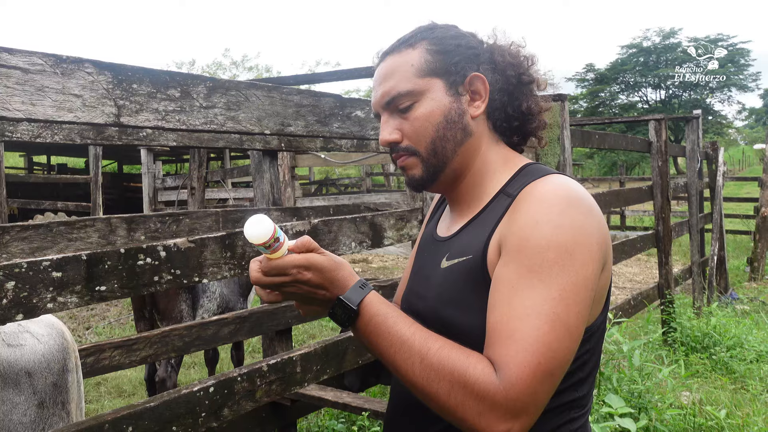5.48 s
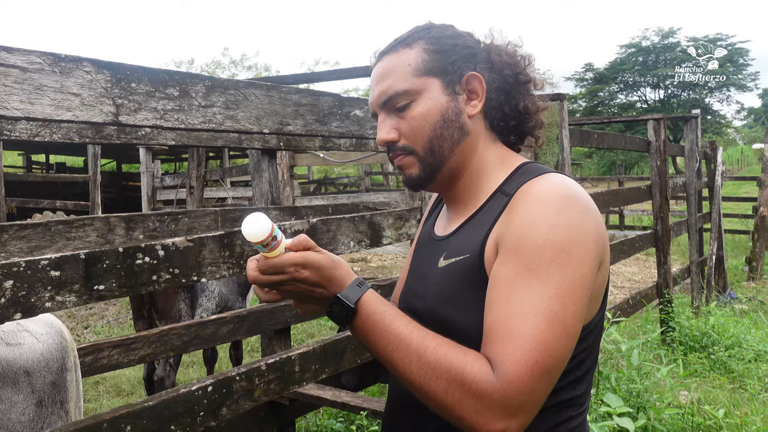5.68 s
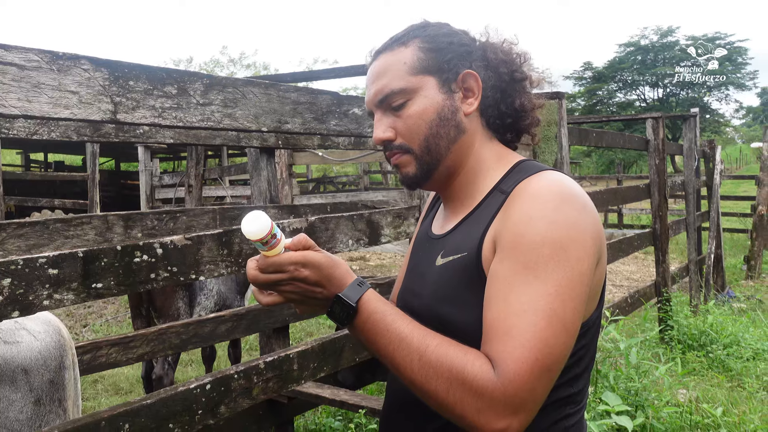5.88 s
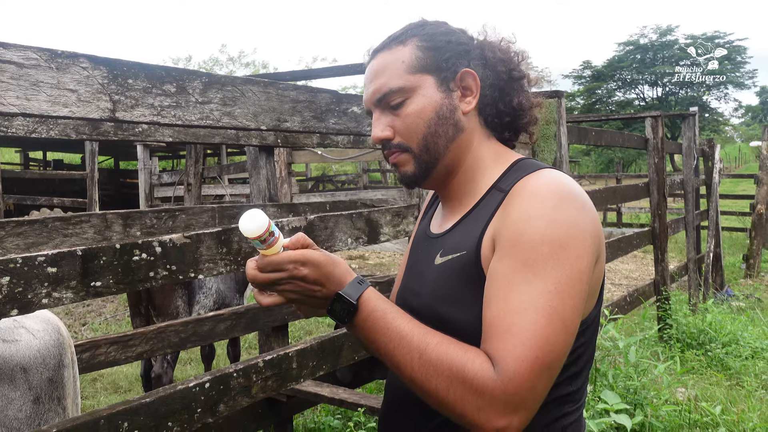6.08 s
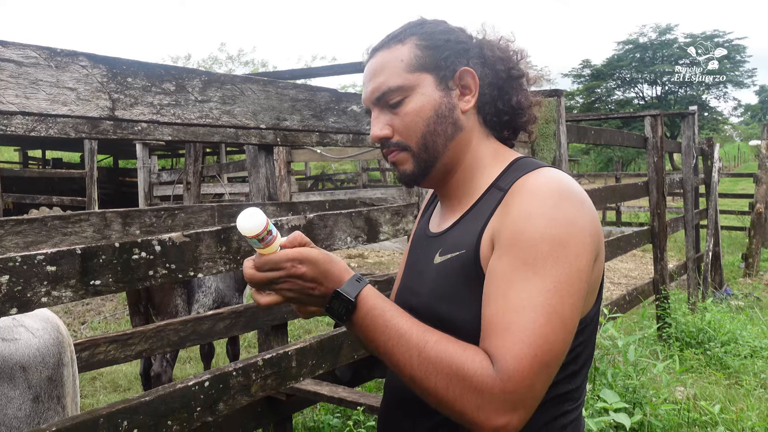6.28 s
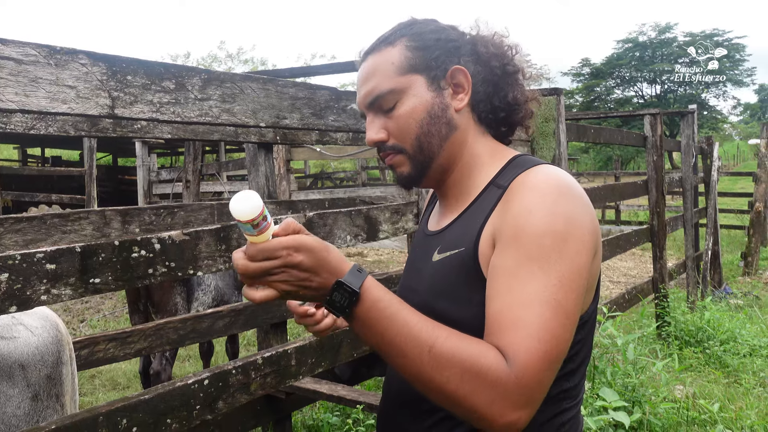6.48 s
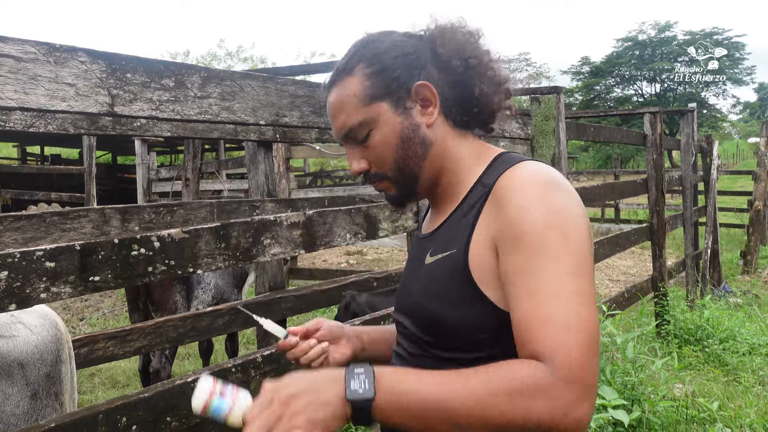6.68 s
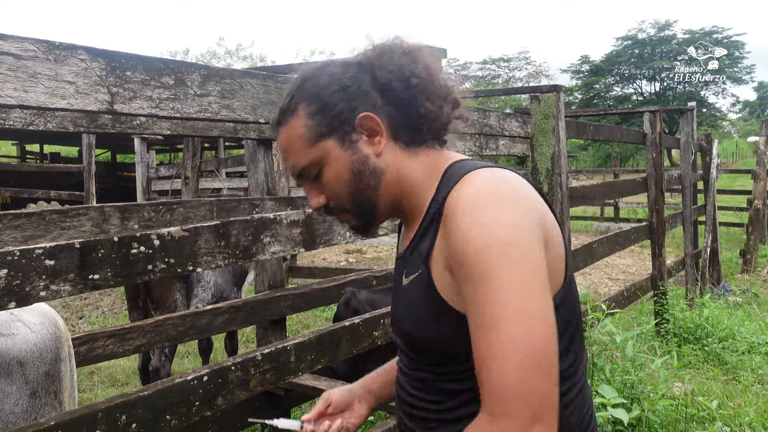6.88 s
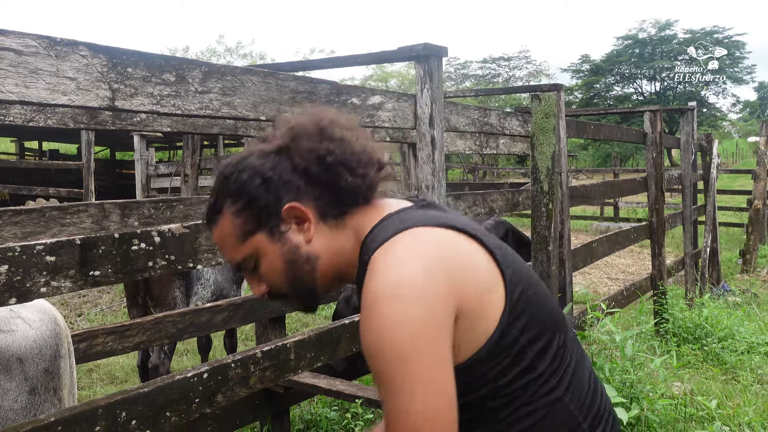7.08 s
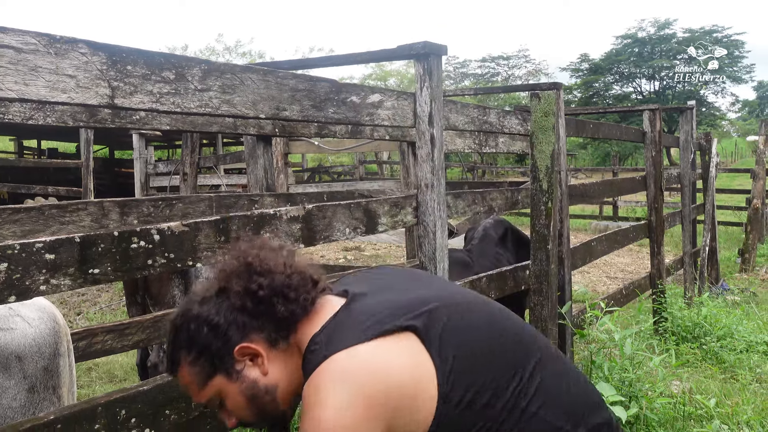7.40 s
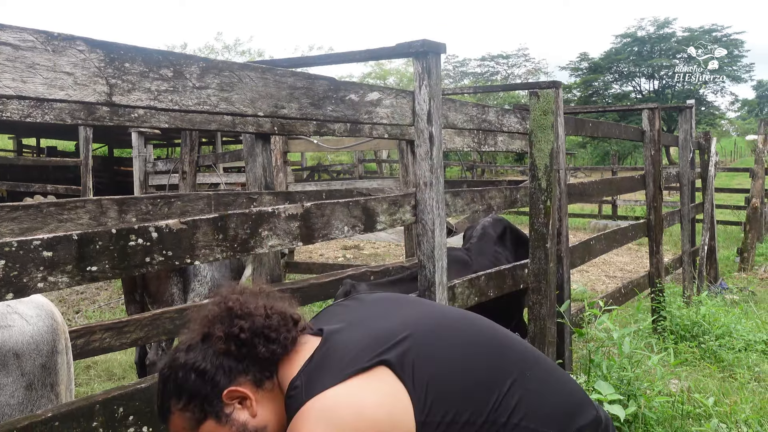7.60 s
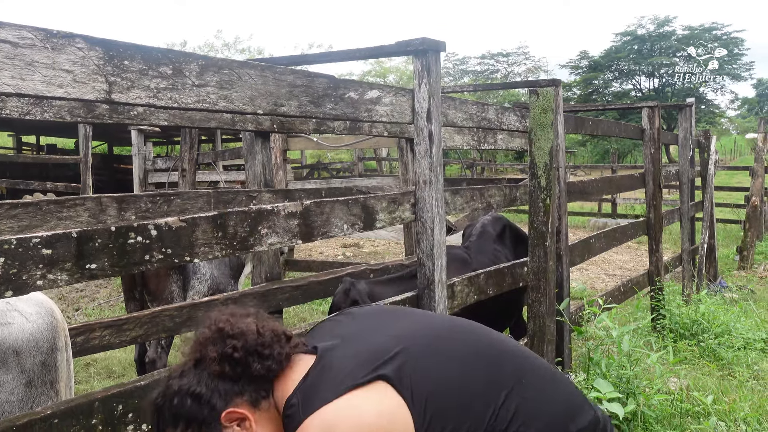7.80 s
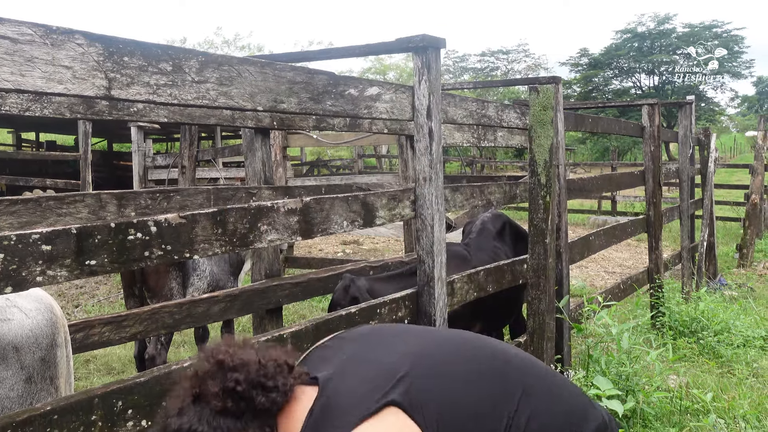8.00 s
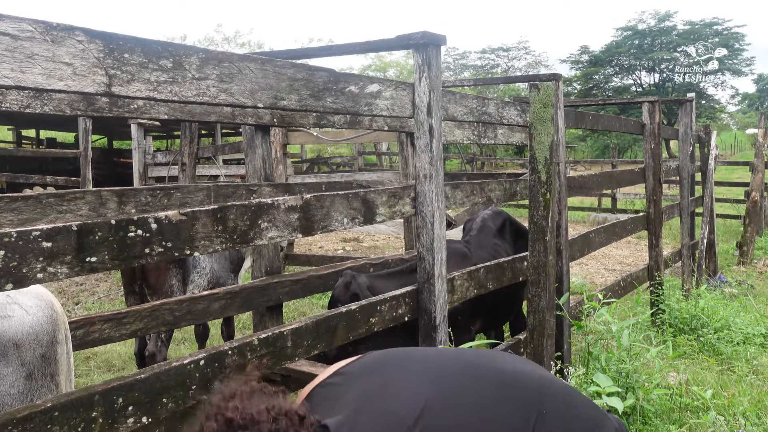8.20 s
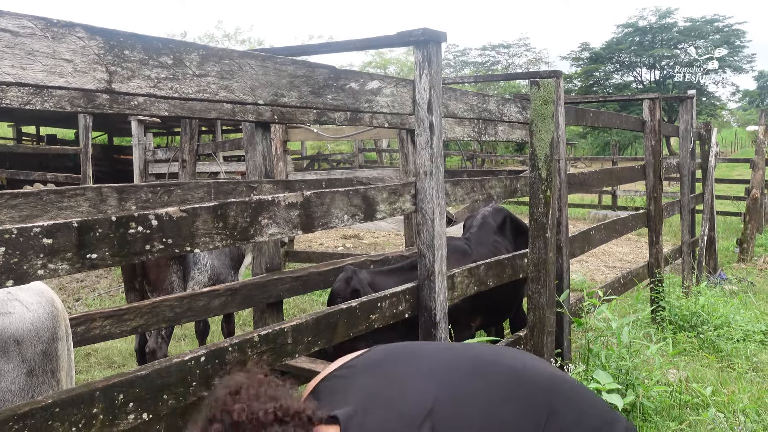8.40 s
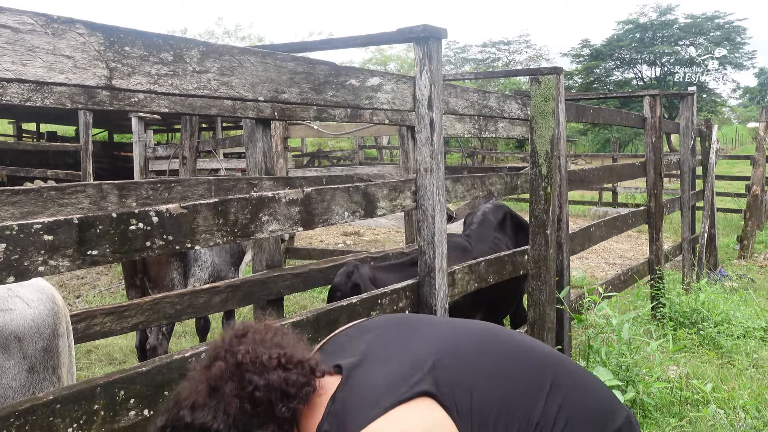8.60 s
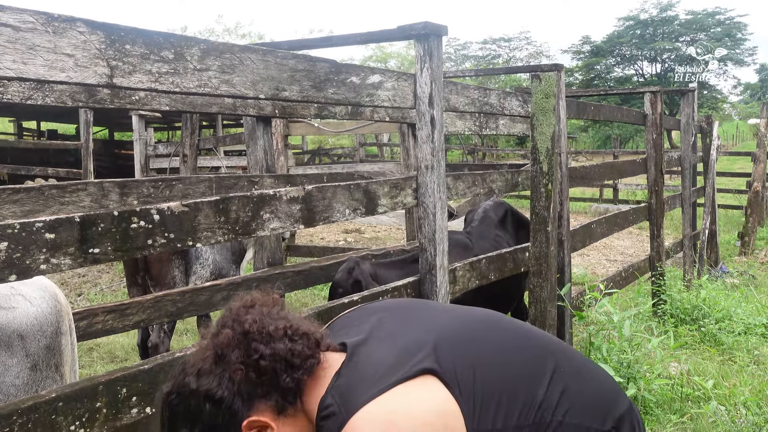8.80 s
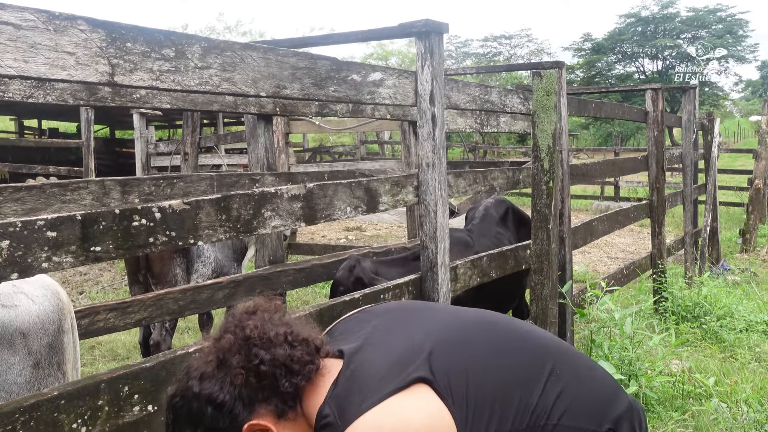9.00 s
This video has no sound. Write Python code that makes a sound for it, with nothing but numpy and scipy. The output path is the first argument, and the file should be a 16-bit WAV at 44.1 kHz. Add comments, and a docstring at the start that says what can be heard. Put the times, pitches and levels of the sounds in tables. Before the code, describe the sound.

An open pasture beside a wooden corral, heard in stereo with faint soft air and hiss. A high pulsed katydid trill runs throughout over a shimmering insect chorus, growing somewhat stronger after 3 s. Small birds give quick falling chips and buzzy chirps all along; clear sinking whistles come at 3.0 and 5.8 s. Far parakeets chatter raspily around 0.4-1 s, 4.6 s and repeatedly from 7.2 to 8.8 s. Dull wooden bumps sound at 0.6, 1.1 and 1.3 s, with a faint one at 2.1 s and tiny clicks at 2.6 s. From 5.3 to 6.0 s a cow gives one short, low, rough nasal moo, opening and then sagging in pitch. Small hard objects click close by at 6.4 s, then clatter sharply on a plank at 7.8-7.9 s, by far the loudest event, with slight outdoor echo. Duller knocks follow at 8.5 and 9.0-9.1 s.

```python
"""A wooden corral in damp pasture: a cow moos once, with a few dull bumps from the pen.
Air is shaped noise; katydids are pulsed falling tones over a noise chorus. Small birds chip and whistle on gliding
tones, and far parakeets chatter in raspy harmonics. Close by, small things are handled and set down on a plank with
a sharp clatter: noise snaps and decaying modes. The moo is a harmonic series weighted by chest, mouth and nose."""
import sys
import numpy as np
from scipy import signal
from scipy.fft import rfft, irfft
from scipy.io import wavfile
from scipy.ndimage import uniform_filter1d

SR = 44100
rng = np.random.default_rng(int(sys.argv[2]) if len(sys.argv) > 2 else 0)


def wav_out(sig):
    """Save sig, one row per channel (or a flat mono array), as 16-bit PCM at SR to the path in sys.argv[1]."""
    wavfile.write(sys.argv[1], SR, np.round(np.clip(np.atleast_2d(sig).T, -1, 1) * 32767).astype(np.int16))


N = 403375
TIME = np.arange(N) / SR
BINS_HZ = np.maximum(np.arange(N // 2 + 1) * SR / N, 1)

# Push of the cow's breath. Each row: time in seconds, chest tone level in dB.
EFFORT = [(5.0, -64.5), (5.3, -60), (5.335, -46.5), (5.37, -42), (5.536, -34), (5.734, -35.5), (5.85, -38),
          (5.907, -36.5), (5.95, -41), (5.98, -45), (6.02, -58)]


def from_db(db):
    """Decibels to amplitude gain."""
    return 10 ** (np.asarray(db) / 20)


def rms_one(x):
    """Scale to unit power."""
    return x / np.sqrt(np.mean(x ** 2) + 1e-20)


def at_hz(points, hz):
    """Read a spectrum on a log-frequency axis."""
    points = np.array(points)
    return np.interp(np.log(hz), np.log(points[:, 0]), points[:, 1])


def follow(rows, t):
    """Read every column of a curve at times t."""
    s, *columns = np.transpose(rows)
    return [np.interp(t, s, c) for c in columns]


def span(start, end):
    """Sample times between two moments in seconds."""
    return start + np.arange(max(int((end - start) * SR), 2)) / SR


def drift(rate_hz, size):
    """Gaussian values drawn rate_hz times a second, joined by straight lines."""
    steps = np.arange(size) * rate_hz / SR
    count = int(steps[-1]) + 2
    return np.interp(steps, np.arange(count), rng.standard_normal(count))


def phase_of(hz):
    """Running phase in radians of a moving pitch."""
    return 2 * np.pi * np.cumsum(hz) / SR


def fade(t, edge_s):
    """Linear ramps at start and end."""
    return np.clip(np.minimum(t - t[0], t[-1] - t) / edge_s, 0, 1)


def panned(x, pan_db):
    """Split to stereo, left minus right = pan_db."""
    return x * from_db(np.array([[.5], [-.5]]) * pan_db)


def add(out, start_s, x):
    """Mix x in at a moment."""
    i = max(round(start_s * SR), 0)
    out[..., i:i + x.shape[-1]] += x[..., :N - i]


def resonances(modes, hz):
    """Summed gain of resonances (Hz, width Hz, dB) at the given frequencies."""
    return sum(from_db(db) / (1 + ((hz - centre) / width * 2) ** 2) for centre, width, db in modes)


def noise(gain):
    """Unit-power stereo noise of a given gain per frequency, ears alike by a share that varies with frequency."""
    # Each row: frequency in Hz, left-right correlation.
    likeness = [(60, 0.64), (110, 0.63), (200, 0.19), (380, 0.58), (700, -0.037), (1290, 0.13),
                (2380, 0.069), (4400, 0.57), (8120, 0.12), (15000, 0.41)]
    # Each row: frequency in Hz, left minus right in dB.
    lean = [(60, -2), (110, 1), (200, 1.5), (380, 3), (700, -8), (1290, 7), (2380, -2.5), (4400, 2.5),
            (8120, -3), (15000, 0)]
    mid, side = rfft(rng.standard_normal((2, N)))
    alike = np.clip(at_hz(likeness, BINS_HZ), 0, .98)
    both = np.sqrt(1 + alike) * mid + np.sqrt(1 - alike) * side * [[1], [-1]]
    return rms_one(irfft(panned(both * gain, at_hz(lean, BINS_HZ)), N))


def scatter(x, t60, delay_s):
    """Diffuse unit-energy echo from fences and foliage, different in each ear; delay_s is its build-up time."""
    t = np.arange(SR // 2) / SR
    echo = rng.standard_normal((2, len(t))) * from_db(-60 * t / t60) * np.clip(t / delay_s, 0, 1)
    echo /= np.sqrt(np.sum(echo ** 2, axis=1, keepdims=True))
    return signal.fftconvolve(np.atleast_2d(x), echo, axes=1)[:, :N]


def struck(modes, t, uneven_db=2.5):
    """Decaying sine modes (Hz, dB, t60 s), each with random strength and sign."""
    ring = 0
    for hz, db, t60 in modes:
        gain = from_db(db + rng.normal(0, uneven_db) - 60 * t / t60)
        ring = ring + gain * np.sin(2 * np.pi * hz * t) * rng.choice([-1, 1])
    return ring


def air():
    """Still air over the pasture: noise shaped to a soft murmur under a faint hiss."""
    # Murmur and hiss spectra. Each row: frequency in Hz, relative density in dB.
    murmur_db, hiss_db = [(18, -83), (30, -43.5), (134, -19.5), (174, -15.5), (230, -13), (352, -13.5),
                          (400, -1), (528, -10), (613, -1.5), (684, -7), (737, -13.5), (903, -9.5),
                          (1280, -17.5), (1730, -16.5), (2500, -22), (3250, -78), (5500, -120)], [(1800, -33), (2600, 3), (3800, 4), (5000, 1), (6200, 13),
                                           (8200, 8.5), (10000, 0.5), (10600, 0.5), (13000, 5), (15500, 0),
                                           (17000, -3)]
    low = from_db(-46.5) * noise(from_db(at_hz(murmur_db, BINS_HZ))) * from_db(0.75 * drift(11, N))
    return low + from_db(-49.0) * noise(from_db(at_hz(hiss_db, BINS_HZ)))


def katydid(strokes_hz, carrier_hz, sweep, unsteady_db):
    """Every wing stroke scrapes out a short tone that falls in pitch."""
    stroke = phase_of(strokes_hz * (1 + 0.0056 * drift(5.8, N))) / (2 * np.pi) % 1
    tone = np.sin(phase_of(carrier_hz * (1 - sweep * (stroke - .5) + 0.00975 * drift(700, N))))
    return rms_one(tone * np.sin(np.pi * stroke) ** 4 * from_db(unsteady_db * drift(25, N)))


def insects():
    """A few katydids of pulsed tone stand out from a chorus of flickering band noise."""
    # Nearest katydid. Each row: time in seconds, level in dB.
    nearest = [(0, -60.5), (3.2, -56.5), (3.7, -52), (7.0, -49.5), (9.15, -52)]
    # Steady ones further off. Each row: wing strokes per second, pitch in Hz, level in dB, pan in dB.
    neighbours = [(64.9, 9150, -62, -19), (60.3, 7380, -58.5, -1), (58.3, 9500, -62, -7)]
    # Far chorus bands. Each row: centre in Hz, width in Hz (before squaring), level in dB.
    chorus = [(7300, 1450, -50.5), (9400, 1730, -50)]
    near = katydid(strokes_hz=65.1, carrier_hz=6870, sweep=0.1, unsteady_db=1.5)
    near = panned(near * from_db(follow(nearest, TIME)[0]), -4.0)
    for strokes_hz, pitch_hz, db, pan_db in neighbours:
        near = near + panned(from_db(db) * katydid(strokes_hz, pitch_hz, sweep=0.059, unsteady_db=3.0), pan_db)
    far = 0
    for hz, width_hz, db in chorus:
        band = noise(resonances([(hz, width_hz, 0)], BINS_HZ) ** 2)
        far = far + from_db(db) * band * from_db(1.0 * drift(110, N))
    return near + from_db(-2.5) * scatter(near, t60=0.38, delay_s=0.002) + far


def note(t, hz, db, overtone_db, waver=0.0066):
    """A nearly pure bird note on a gliding pitch, fluttering in level."""
    phase = phase_of(hz * (1 + waver * drift(394.0, len(t))))
    envelope = from_db(db + 1.3 * drift(130, len(t))) * fade(t, .002)
    return envelope * (np.sin(phase) + from_db(overtone_db) * np.sin(2 * phase))


def near_birds():
    """Sinking whistled songs, faint rising slurs and quick falling tsiks: gliding tones, centred but for the echo."""
    # Repeats of one song. Each row: start in seconds, level in dB, pitch factor.
    songs = [(2.959, -32.5, 0.996), (5.81, -31, 1.008)]
    # Grace note, long whistle with two fainter echoes of the grace note above it, closing slur. Each row:
    # seconds after onset, length in seconds, start and end in Hz and extra onset Hz (all before tune and droop),
    # relative level in dB, dying away in dB.
    song_notes = [(0.003, 0.0266, 5100, 4370, 300, -4, 6), (0.023, .235, 3860, 3313, 354, 1.5, 18.5),
                  (0.027, .035, 4600, 4540, 0, -7, 6), (.135, 0.057, 4640, 4580, 0, -16, 4),
                  (0.256, 0.037, 3900, 3370, 1400, -5.5, 6)]
    # Rising slurs. Each row: start in seconds, length in seconds, starting Hz, level in dB.
    slurs = [(1.115, .11, 4330, -52), (1.332, .11, 3700, -55.5)]
    # Each row: start in seconds, level in dB, pitch factor.
    tsiks = [(0.145, -41, 1.04), (0.722, -38, 0.96), (1.26, -42.5, 0.98), (1.936, -47, 1.2),
             (3.034, -38, 1.05), (3.246, -39.5, 0.96), (3.524, -38.5, 1.1), (3.948, -45, 1.17),
             (4.447, -45, 1.2), (5.161, -47, 0.86), (5.562, -40, 0.98), (6.179, -34, 1),
             (6.532, -34.5, 1.09), (7.114, -39.5, 1.02), (7.545, -36, 1.09), (8.279, -42.5, 0.94),
             (8.781, -37.5, 0.94)]
    # One tsik. Each row: seconds after onset, Hz at factor 1, relative level in dB.
    tsik = [(0, 6400, -14), (.004, 5900, 0), (.011, 4900, -1), (.019, 4000, -3), (.027, 3250, -9),
            (.032, 2950, -22)]
    droop = 0.087  # pitch share lost by the end of the long whistle, less in shorter notes
    drop_s, attack_s, slur_rise_hz_per_s = 0.00424, 0.0071, 5200
    out = np.zeros(N)
    for start_s, song_db, tune in songs:
        for after_s, length_s, from_hz, to_hz, drop_hz, db, dying_db in song_notes:
            t = span(0, length_s)
            sag = 1 - droop * (t / song_notes[1][1]) ** 4
            glide_hz = from_hz + (to_hz - from_hz) * t / length_s + drop_hz * np.exp(-t / drop_s)
            level_db = song_db + db - dying_db * (t / length_s) ** 2
            whistle = note(t, tune * sag * glide_hz, level_db, overtone_db=-15.0)
            add(out, start_s + after_s, whistle * fade(t, attack_s))
    for start_s, length_s, from_hz, db in slurs:
        t = span(0, length_s)
        add(out, start_s, note(t, from_hz + slur_rise_hz_per_s * t, db, overtone_db=-19.0))
    t = span(0, tsik[-1][0])
    tsik_hz, tsik_db = follow(tsik, t)
    for start_s, db, tune in tsiks:
        add(out, start_s, note(t, tune * tsik_hz, db + tsik_db, overtone_db=-29, waver=0.0295))
    return out + from_db(-9) * scatter(out, t60=0.97, delay_s=0.016)


def shrill_share(hz):
    """How far a frequency belongs to the shrill top of a call, 0-1."""
    from_hz, full_hz = 3660, 4660
    return np.clip((hz - from_hz) / (full_hz - from_hz), 0, 1)


def squawk(length_s, pitch_hz, arch, shrill_db=0, rasp=0.018, root_db=-4):
    """A raspy parakeet call: six harmonics on an arching, jittered pitch, the lowest changed by root_db."""
    # Call spectrum. Each row: frequency in Hz, relative level in dB.
    screech = [(600, -57), (1100, -0.5), (1550, -5.5), (2050, 1), (3200, -1.5), (4000, 2.5), (4900, -6.5),
               (5600, -7.5), (6800, -24)]
    t = span(0, length_s)
    hz = pitch_hz * (1 - arch * (2 * t / length_s - 1) ** 2 + rasp * drift(900, len(t)))
    k = np.arange(1, 7)[:, None]
    partial_hz = k * pitch_hz
    gains = from_db(at_hz(screech, partial_hz) + shrill_db * shrill_share(partial_hz) + root_db * (k == 1))
    return rms_one(np.sum(gains * np.sin(k * phase_of(hz)), axis=0)) * np.sin(np.pi * t / length_s)


def parakeets(count=700, far_rasp=0.055, blur=0.7, voice_hz=1600, low_voice_hz=1250, voice_spread=0.13):
    """Many overlapping far calls blur into a wash that swells in bouts, some shriller; a few calls stand out."""
    # Each row: peak time in seconds, peak level in dB, swell time in seconds, shrillness in dB.
    bouts = [(.37, -46.5, 0.037, -2.5), (.74, -43, 0.17, 2), (1.0, -43.5, 0.057, 10.5),
             (4.45, -50.5, 0.038, 5.5), (4.62, -47, 0.078, 7.5), (4.74, -41.5, 0.075, 1.5),
             (6.18, -46.5, 0.1, 2), (7.27, -42.5, 0.11, -3), (7.41, -42.5, 0.072, -17),
             (7.67, -41.5, 0.077, -8), (8.0, -47, 0.12, -4), (8.12, -43.5, 0.095, -10),
             (8.45, -38, 0.072, -9), (8.55, -37, 0.025, -5), (8.74, -43, 0.09, 4)]
    # Clearest calls. Each row: start in seconds, length in seconds, pitch in Hz, relative level in dB,
    # shrillness in dB, arch as a share of pitch.
    squawks = [(0.68, 0.049, 1495, -45, 3, 0.035), (0.722, 0.045, 1535, -40.5, -4, 0.075),
               (0.947, 0.046, 1563, -39, -2, 0.05), (0.992, 0.054, 1273, -37, 14, 0.082),
               (4.63, 0.071, 1588, -41, 7, 0.028), (4.681, 0.064, 1596, -41.5, -3, 0.024),
               (4.741, .05, 1330, -41.5, 6, 0.04), (7.232, 0.043, 1573, -44, -8, 0.057),
               (7.306, 0.059, 1660, -45, -8, .05), (7.335, 0.049, 1790, -41, -10, 0.1),
               (7.373, 0.031, 1650, -40, -8, 0.13), (7.427, 0.045, 1630, -41.5, -8, .1),
               (7.587, 0.055, 1876, -49, -8, 0.058), (7.637, 0.046, 1710, -39, -4, 0.089),
               (7.74, 0.038, 1530, -42.5, -7, .05), (7.981, 0.049, 1870, -37, 2, 0.046),
               (8.058, 0.052, 1790, -36.5, -10, 0.053), (8.104, 0.034, 1697, -38.5, -10, 0.068),
               (8.162, 0.029, 1970, -43, -4, 0.054), (8.313, 0.068, 1640, -41.5, -3, 0.063),
               (8.652, 0.078, 2020, -41.5, -2, 0.046), (8.713, .05, 1650, -44, -10, 0.058)]
    fall, roundness = 2.02, 1.18  # fall in swell times; roundness 1 = pointed peak, 2 = bell
    crowd, clear = np.zeros(N), np.zeros(N)
    # two calls in three, on average, are pitched high
    pitches = rng.choice([voice_hz, voice_hz, low_voice_hz], count)
    pitches = pitches * np.exp(voice_spread * rng.standard_normal(count))
    for (when, length, arch), pitch_hz in zip(rng.random((count, 3)), pitches):
        call = squawk(.03 + 0.04915 * length, pitch_hz, arch=0.1014 * arch, rasp=far_rasp, root_db=-2)
        add(crowd, when * N / SR, call)
    crowd = crowd + blur * scatter(crowd, t60=0.49, delay_s=0.0048)
    # level the wash so that the bouts alone set its swell
    crowd /= np.sqrt(uniform_filter1d(np.mean(crowd ** 2, axis=0), SR // 12) + 1e-6)
    top = irfft(rfft(crowd) * shrill_share(BINS_HZ), N)
    # overlapping bouts add in power
    power, top_power = 0, 0
    for peak_s, db, swell_s, shrill_db in bouts:
        away = np.maximum(peak_s - TIME, (TIME - peak_s) / fall) / swell_s
        bout = (from_db(db) * np.exp(-away ** roundness)) ** 2
        power = power + bout
        top_power = top_power + bout * from_db(shrill_db) ** 2
    for start_s, length_s, pitch_hz, db, shrill_db, arch in squawks:
        add(clear, start_s, from_db(db) * squawk(length_s, pitch_hz, arch, shrill_db))
    wash = np.sqrt(power) * (crowd - top) + np.sqrt(top_power) * top
    echo = scatter(clear, t60=0.95, delay_s=0.0041)
    return panned(wash + from_db(-1.0) * clear + from_db(-3.5) * echo, -4.0)


def bumps(contact_s=0.0041, reach=0.94):
    """Dull blows on wood: soft contact wakes mainly the rail modes near each blow's own pitch."""
    # Each row: start in seconds, peak level in dB (before echo), centre in Hz.
    blows = [(.557, -29, 434), (0.642, -33.5, 423), (0.674, -26, 440), (1.074, -35, 397), (1.283, -31, 547),
             (2.106, -38, 191), (8.538, -30, 1320), (9.01, -24, 980), (9.039, -37, 810), (9.05, -39, 474),
             (9.088, -29.5, 1350), (9.116, -25, 940), (9.137, -28, 1310)]
    # Modes of the rail. Each row: frequency in Hz, relative level in dB, t60 in seconds.
    rail = [(161, -17, 0.079), (238, -11.5, 0.091), (419.7, 3.5, 0.1), (485, 12, 0.038), (570, -10, 0.02),
            (856, 10.5, 0.026), (1110, 4, 0.034), (1227, 8, 0.027), (1377, 12, 0.036)]
    out, t = np.zeros(N), span(0, .2)
    for start_s, db, centre_hz in blows:
        modes = [(hz, level_db - 10 * reach * np.log2(hz / centre_hz) ** 2, t60) for hz, level_db, t60 in rail]
        blow = struck(modes, t) * fade(t, contact_s)
        add(out, start_s, from_db(db) * blow / np.abs(blow).max())
    return out + from_db(-0.5) * scatter(out, t60=0.35, delay_s=0.0061)


def tree_birds(length_s=0.044, buzz_hz=170, leaves_t60=0.65):
    """Buzzy chips, short tones warbled in pitch, reach the ears mostly by way of the leaves."""
    # Each row: start in seconds, relative level in dB, pitch in Hz, warble depth as a share of pitch, pan in dB.
    chips = [(0.565, -32.5, 5300, 0.061, -5), (1.232, -31, 5230, 0.037, -3), (1.494, -34.5, 5040, 0.11, -3),
             (2.299, -33, 5400, 0.047, -6), (2.412, -33, 4860, 0.062, -2), (3.204, -31, 5300, 0.054, -6),
             (3.244, -36, 5090, 0.073, 1), (4.061, -35.5, 5380, 0.059, -10), (4.109, -35.5, 4990, 0.099, 0),
             (5.16, -35, 5080, 0.087, -4), (5.204, -31, 5300, 0.03, -1), (5.911, -32.5, 5140, 0.056, -6),
             (6.004, -31, 5155, 0.107, 0), (6.675, -32, 5160, 0.092, -5), (6.73, -38.5, 5200, 0.033, -2),
             (7.48, -33, 5270, 0.04, -3), (7.992, -36.5, 4900, 0.069, -3), (8.404, -31, 5320, 0.049, -3),
             (8.755, -35.5, 4990, 0.065, -2)]
    out, t = np.zeros((2, N)), span(0, length_s)
    for start_s, db, hz, depth, pan_db in chips:
        warble = depth * (np.sin(2 * np.pi * buzz_hz * t) + 0.726 * drift(696.0, len(t)))
        chip = np.sin(phase_of(hz * (1 + warble))) * fade(t, 0.00074) * from_db(-5 * t / length_s)
        add(out, start_s, panned(from_db(db) * chip, pan_db))
    return from_db(-4.5) * out + from_db(1.0) * scatter(out, t60=leaves_t60, delay_s=0.0014)


def contacts(rows, modes, crack, crack_t60, snap_t60, snap_db, crack_db, ring_db, floor_db, tick_db,
             tick_t60=0.0044, tick_rise_s=0.00043, width_share=0.057):
    """Each contact is a snap, a gritty crack tinged by the object's modes, and their ring; fast rises tick brighter."""
    tinge = resonances([(hz, width_share * hz, 0) for hz, db, t60 in modes], BINS_HZ)
    body = from_db(floor_db) + tinge
    grit = noise(from_db(at_hz(crack, BINS_HZ)) * body)[0]
    out, t = np.zeros((2, N)), span(0, .2)
    decay = from_db(-60 * t / crack_t60) + from_db(snap_db - 60 * t / snap_t60)
    for k, (start_s, db, bright_hz, low_hz, pan_db, rise_s) in enumerate(rows):
        gritty = from_db(crack_db) * grit[k * len(t):(k + 1) * len(t)] * decay
        hit = (gritty + from_db(ring_db) * struck(modes, t, uneven_db=1.5)) * fade(t, rise_s)
        band_hz = [low_hz, min(2 * bright_hz, .45 * SR)]
        shaped = signal.sosfilt(signal.butter(2, band_hz, "band", fs=SR, output="sos"), hit)
        tick = rng.standard_normal(len(t)) * from_db(tick_db - 60 * t / tick_t60) * fade(t, rise_s)
        tick = tick * (tick_rise_s / rise_s) ** 2
        # filtering keeps the loudness of the hit
        add(out, start_s, panned(from_db(db) * (rms_one(shaped) * hit.std() + tick), pan_db))
    return out


def clatter():
    """Small hard things click together in the hands, then knock on the plank: noise bursts and ringing modes."""
    # Clicks in the hands, knocks on the plank. Each row: start in seconds, relative level in dB,
    # brightness in Hz (half the high cut), low cut in Hz, pan in dB, rise in seconds.
    click_rows, knock_rows = [(2.614, -32.5, 5960, 1500, 7, 0.0014), (2.643, -37, 6000, 1500, 2, .0015),
                              (6.3685, -20.5, 8950, 4000, 0, 0.0011), (6.372, -20.5, 9000, 5000, 0, 0.0011),
                              (6.379, -22, 9000, 5000, 8, 0.0017), (6.395, -16, 8000, 600, -1, 0.0015),
                              (6.402, -21, 8000, 500, 4, 0.0017), (6.454, -24.5, 3200, 3000, 6, .002),
                              (6.474, -14, 2190, 850, 6.5, 0.00067), (6.484, -20, 3000, 1000, 4, 0.0029)], [(7.775, -2, 3970, 250, 2.5, 0.0023),
                                              (7.7815, 2.5, 5150, 200, -1, 0.00066),
                                              (7.827, -11.5, 6060, 250, -.5, 0.0007),
                                              (7.843, -5.5, 6500, 298, 0, 0.00052),
                                              (7.8585, -16, 3500, 2490, 11, 0.00054),
                                              (7.8635, -1.5, 4020, 252, 0, 0.0047),
                                              (7.869, -1.5, 3500, 248, -1, 0.0016),
                                              (7.895, -28, 2000, 1200, -2, .001),
                                              (9.1155, -21.5, 4000, 700, -3, 0.0013)]
    # Modes of the things and the plank. Each row: frequency in Hz, relative level in dB, t60 in seconds.
    trinket, plank = [(680, -1.5, .055), (1235, 3.5, 0.044), (1687, -9, 0.12), (2000, -9, 0.14),
                      (2630, -1.5, 0.054), (3080, 5, .035), (3670, -12, 0.063), (4290, -11, 0.028),
                      (5550, 4, .035), (6850, -3, 0.037), (7780, 2, .03), (9330, -1, .03)], [(369, -15, 0.14), (434, -10.5, 0.18), (747, -4, 0.04),
                                       (883, -3, 0.061), (1200, -4, 0.052), (1520, 1.5, 0.068),
                                       (1730, -7, 0.061), (2150, -4.5, 0.062), (2330, -12, 0.035),
                                       (3290, 0, 0.023), (3640, 2, 0.018), (4190, 5, 0.017),
                                       (4620, -11, 0.02), (5050, 2, 0.019)]
    # Crack spectra. Each row: frequency in Hz, relative density in dB.
    click_crack, knock_crack = [(200, -30), (600, -2), (1300, -1), (3200, -1), (6000, -5), (10000, -9),
                                (13000, -22)], [(120, -58), (200, -19), (427, -7), (540, -5),
                                                     (880, -6), (1090, -11.5), (1510, -7), (1810, -10),
                                                     (2460, -4), (5760, -15.5), (7020, -12), (11000, -27),
                                                     (13000, -33), (15000, -42)]
    clicks = contacts(click_rows, trinket, click_crack, crack_t60=0.089, snap_t60=0.0069, snap_db=12,
                      crack_db=-14, ring_db=-20, floor_db=5, tick_db=-10)
    knocks = contacts(knock_rows, plank, knock_crack, crack_t60=0.052, snap_t60=0.0085, snap_db=4,
                      crack_db=-13.5, ring_db=-18, floor_db=4.5, tick_db=-15)
    out = clicks + knocks
    early = scatter(out, t60=0.031, delay_s=0.0024)
    late = scatter(out, t60=0.92, delay_s=0.03)
    return out + from_db(-16.0) * early + from_db(-17.0) * late


def moo_gesture(t):
    """Pitch arches and sags, roughness follows pitch, the jaw sets strength and colour of the mouth tone."""
    # Pitch arches, then sags as the breath runs out. Each row: time in seconds, pitch in Hz.
    pitch_curve = [(5.2, 81.8), (5.314, 83.05), (5.366, 84.5), (5.552, 85.3), (5.724, 84.66), (5.802, 82.9),
                   (5.86, 79.3), (5.9, 73.8), (5.95, 66.8), (5.99, 62.2)]
    # Each row: time in seconds, jaw opening 0-1.
    jaw = [(5.33, 0), (5.39, 0), (5.45, 0.83), (5.64, 1), (5.73, 0.73), (5.8, 0.28), (5.9, 0.16),
           (6.03, 0.25)]
    # Nasal resonance rings out as the jaw swings. Each row: time and half length in seconds, boost in dB.
    twangs = [(5.388, 0.031, 11), (5.796, 0.017, 9)]
    twang_share = 0.72  # share of the boost that lifts the whole mouth tone
    clean_rough, rough_per_hz, most_rough = 0.12, 0.079, 0.59  # cleanest at top pitch
    lips_part_s, lips_part_takes_s = 5.325, 0.038
    lips_meet_s, lips_meet_takes_s = 6.0, 0.11
    shut_mouth_db, wide_mouth_db = 2, 4.5  # mouth over chest tone, before hum and twang
    hum_mouth_db = -5.5  # change while humming
    nose_shut_hz, nose_wide_hz, nose_shut_db, nose_wide_db = 1680, 1640, -5.5, 0.5
    pitch = follow(pitch_curve, t)[0]
    rough = np.minimum(clean_rough + rough_per_hz * (pitch.max() - pitch), most_rough)
    chest_db, opening = follow(EFFORT, t)[0], follow(jaw, t)[0]
    parting, meeting = (t - lips_part_s) / lips_part_takes_s, (lips_meet_s - t) / lips_meet_takes_s
    humming = 1 - np.clip(np.minimum(parting, meeting), 0, 1)
    twang_db = sum(db * np.exp(-((t - s) / half_s) ** 2) for s, half_s, db in twangs)
    mouth_db = chest_db + shut_mouth_db + (wide_mouth_db - shut_mouth_db) * opening
    mouth_db = mouth_db + hum_mouth_db * humming + twang_share * twang_db
    nose_hz = nose_shut_hz + (nose_wide_hz - nose_shut_hz) * opening
    nose_db = nose_shut_db + (nose_wide_db - nose_shut_db) * opening + hum_mouth_db * humming + twang_db
    return pitch, rough, chest_db, mouth_db, opening, nose_hz, nose_db


def ringing_phase(modes, hz):
    """Phase that a set of resonances gives to each harmonic of a pulse."""
    return np.angle(sum(from_db(db) / (1 + 2j * (hz - centre) / width) for centre, width, db in modes))


def cow(jitter=0.01, flutter=0.21, breath_db=-20, nose_width_hz=75, lowest_hz=200, hum_waver_db=6.0):
    """Glottal pulses ring in chest, mouth and nose; the jaw shifts the mouth's weights, harmonics fray as pitch sinks."""
    # Low resonances of the cow in its pen. Each row: frequency in Hz, width in Hz, relative level in dB.
    chest_modes = [(204, 35.7, 5), (255, 15, 1), (310, 27, -9), (345.6, 18, -7), (410, 56, -17.5),
                   (595, 74, -20)]
    # Each row: frequency in Hz, width in Hz, relative level in dB with jaw shut, the same with jaw wide.
    mouth_modes = [(850, 45, -22, -25), (1037, 63, -4.5, -20), (1080, 50, 6, -24), (1194, 24, 0, -7.5),
                   (1270, 31, -6, -27), (1370, 46, -9, 2), (1430, 58, -24, -16), (1790, 43, -21, -14),
                   (2300, 83, -19, -16), (2790, 140, -20, -14.5), (3000, 270, -15.5, -23.5),
                   (3500, 200, -32, -26), (4030, 1300, -25, -27.5)]
    # Closed-mouth hum on the second harmonic, before and through the moo. Each row: time in seconds, level in dB.
    hum = [(5.0, -68), (5.2, -63), (5.33, -53), (5.85, -48), (5.93, -57), (6.03, -72)]
    t = span(EFFORT[0][0], EFFORT[-1][0])
    pitch, rough, chest_db, mouth_db, opening, nose_hz, nose_db = moo_gesture(t)
    pitch = pitch * (1 + jitter * (0.077 + rough) * drift(70.8, len(t)))
    phase, k = phase_of(pitch), np.arange(2, 56)[:, None]
    waver, swell = np.array([[drift(rate_hz, len(t)) for _ in k] for rate_hz in (90, 7)])
    # reflections in the pen smear each pulse, the higher harmonics most
    smear = np.sqrt(k) * rng.standard_normal(k.shape) * 0.3
    turning = k * phase + smear + flutter * rough * waver * k / 2
    hz = k * pitch
    throat = [(nose_hz, nose_width_hz, nose_db)]
    throat += [(centre, width, shut + (wide - shut) * opening) for centre, width, shut, wide in mouth_modes]
    # the deepest tones radiate poorly; each harmonic swells and sinks on its own
    chest = resonances(chest_modes, hz) / (1 + (lowest_hz / hz) ** 4) * from_db(1.5 * swell)
    mouth = resonances(throat, hz) * from_db(0.1 * k * swell)
    hum_gain = from_db(follow(hum, t)[0] + hum_waver_db * drift(25.3, len(t)))
    voice = hum_gain * np.sqrt(2) * (np.sin(2 * phase) + from_db(-21) * np.sin(phase))
    for modes, gains, level_db in (chest_modes, chest, chest_db), (throat, mouth, mouth_db):
        partials = gains * np.cos(turning + ringing_phase(modes, hz))
        loudness = np.sqrt(np.sum(gains ** 2, axis=0) / 2)
        voice = voice + from_db(level_db) * np.sum(partials, axis=0) / loudness
    # air escapes in a puff on every cycle
    open_mouth = [(centre, width, wide) for centre, width, shut, wide in mouth_modes]
    tilt = np.minimum(BINS_HZ, mouth_modes[-1][0]) ** 1.7
    puffs = noise(resonances(open_mouth, BINS_HZ) * tilt)[0, :len(t)] * (1 + np.cos(phase))
    breath = puffs * from_db(mouth_db + breath_db) * (.5 + rough)
    out = np.zeros(N)
    add(out, t[0], (voice + breath) * fade(t, 0.017))
    return out + from_db(-15) * scatter(out, t60=.65, delay_s=.02)


def scene():
    """Everything heard from beside the fence."""
    return air() + insects() + near_birds() + parakeets() + bumps() + tree_birds() + clatter() + cow()


def record(dry):
    """Peaks clip at full scale, then a steep low-pass cuts the top."""
    cutoff_hz = 15800
    low_pass = signal.ellip(10, .1, 80, cutoff_hz, fs=SR, output="sos")
    return signal.sosfilt(low_pass, np.clip(dry, -1, 1))


dry = scene()
out = record(dry)
wav_out(out)
```